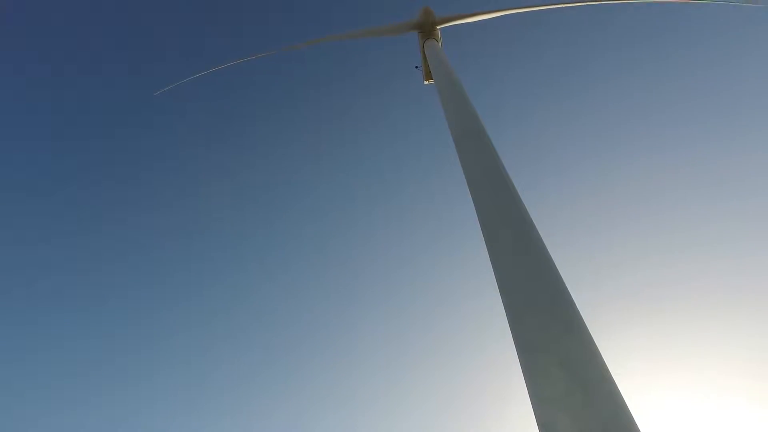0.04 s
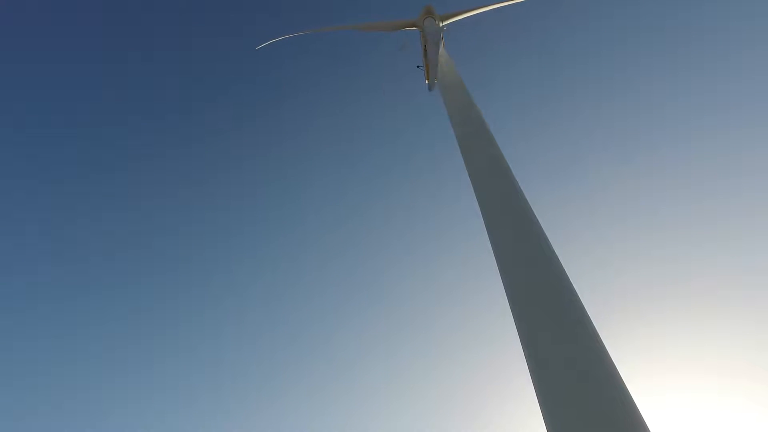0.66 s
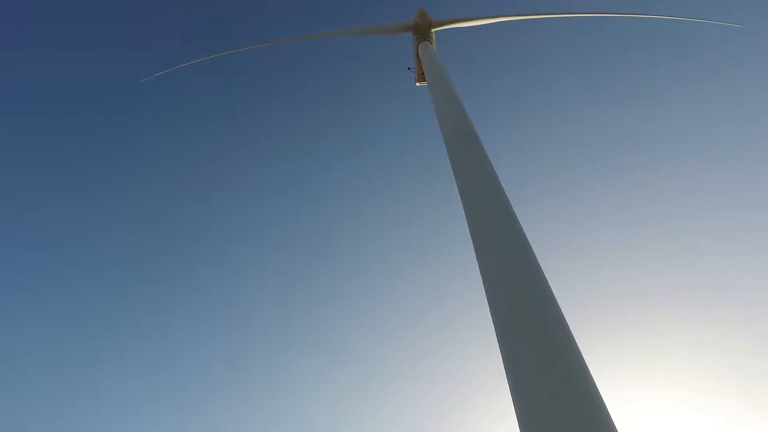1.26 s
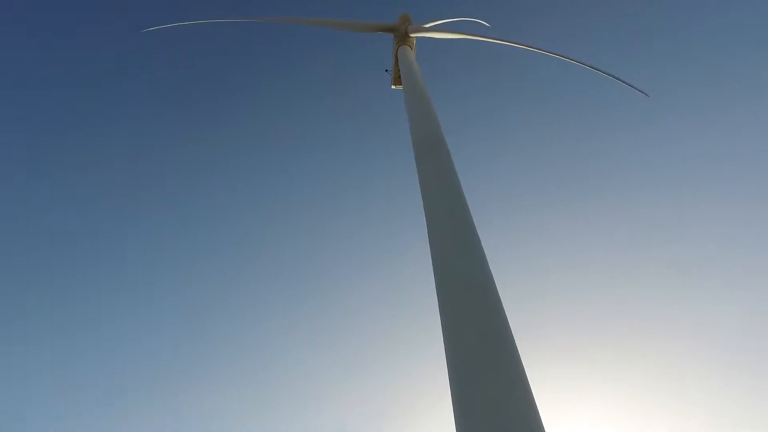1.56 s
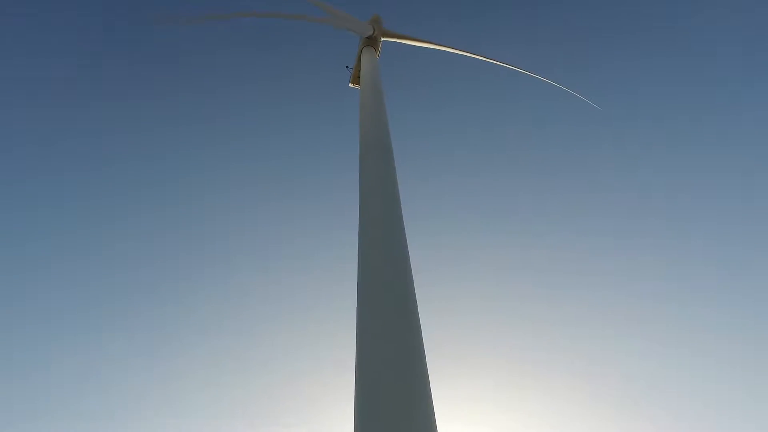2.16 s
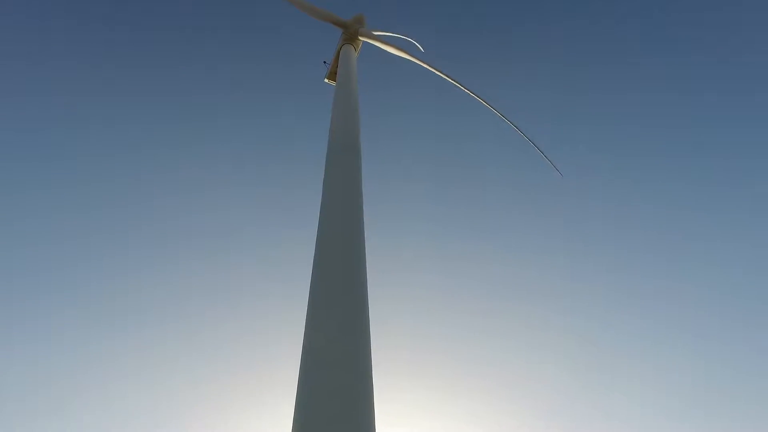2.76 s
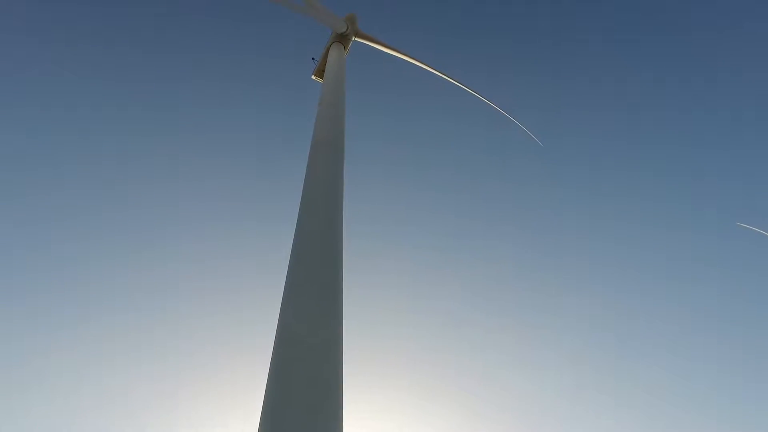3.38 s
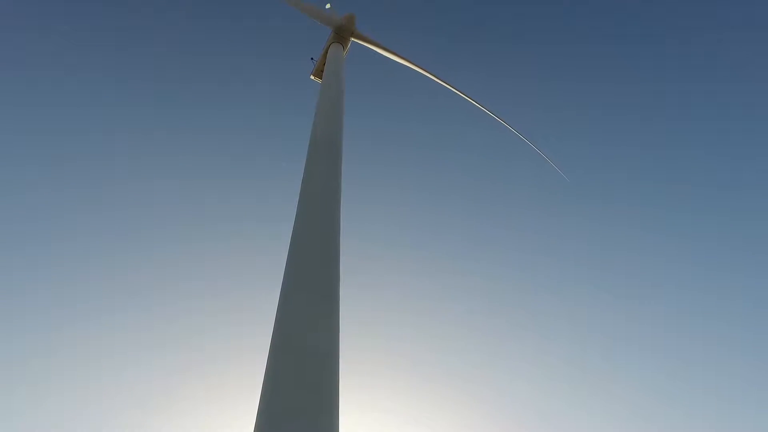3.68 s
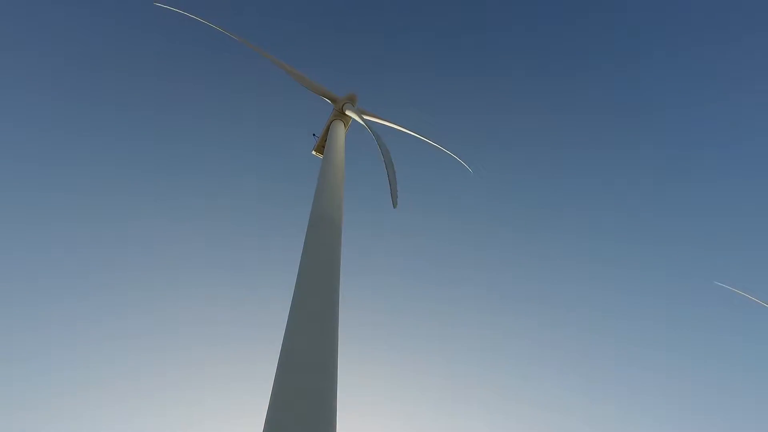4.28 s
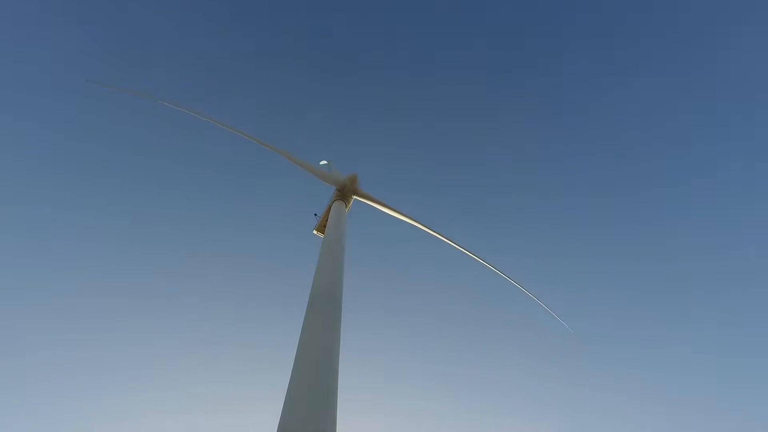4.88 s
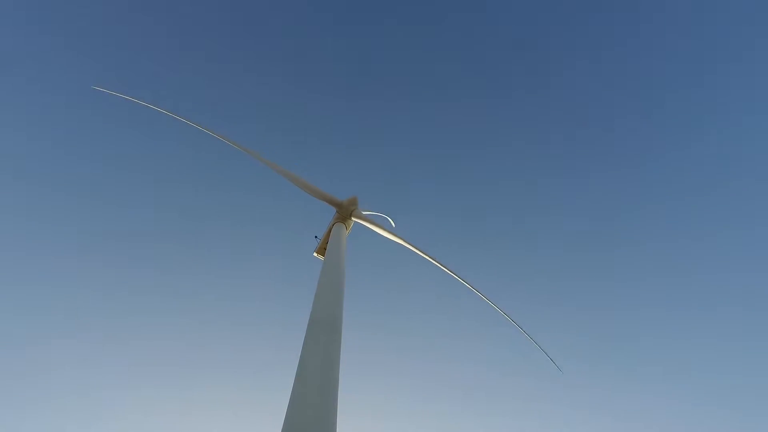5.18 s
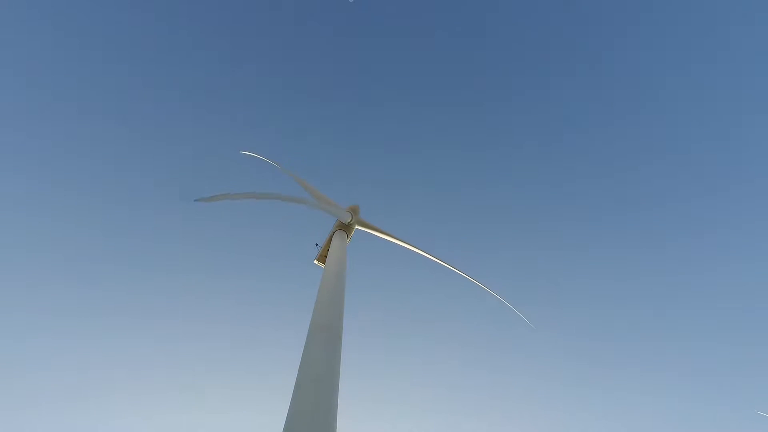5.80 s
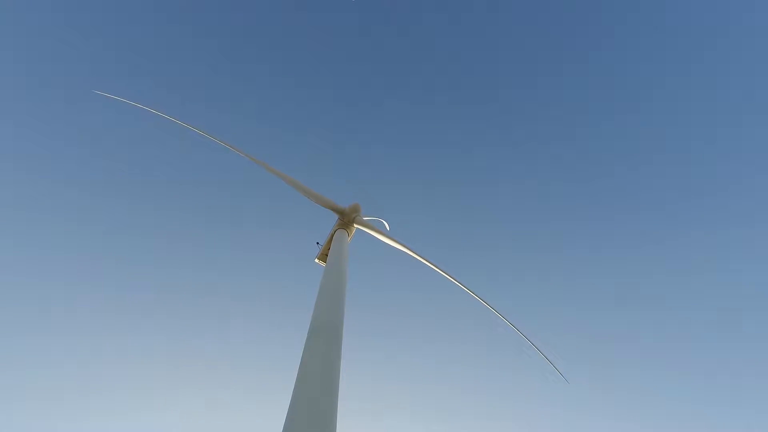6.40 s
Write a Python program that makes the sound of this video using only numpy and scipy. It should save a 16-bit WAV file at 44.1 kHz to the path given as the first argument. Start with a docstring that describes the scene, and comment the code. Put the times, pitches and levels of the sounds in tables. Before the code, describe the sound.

Strong wind buffets the microphone outdoors throughout, a deep, uneven rumble that is the loudest sound. It swells at around 0.5 to 1 second, eases, rises again near 2.5 to 3 seconds and drops back. The heaviest gust arrives at about 5 seconds and briefly overloads the microphone, with another surge near 6.4 seconds. Underneath, a wind turbine overhead makes a steady low roar. Its blades pass with soft swooshes at roughly 0.3, 1.7, 2.8, 4.1, 5.3 and 6.6 seconds, most sliding down in pitch and each leaving a fine, flickering hiss of air. The turbine's machinery adds a faint, blurred low hum with a thin higher tone. One brief, faint squeak, rising slightly, comes at about 4.5 seconds.

```python
"""Under a wind turbine in strong wind

Gusts buffet the microphone with a low rumble that briefly overloads it. Overhead the rotor
roars, and about every 1.2 s a blade sweeps down with a soft swoosh. The drive train hums
faintly under a fine hiss of rushing air, and there is one small squeak."""
import sys
import numpy as np
from scipy import signal
from scipy.fft import rfft, irfft, next_fast_len
from scipy.io import wavfile
from scipy.ndimage import uniform_filter1d, map_coordinates

SR = 44100
rng = np.random.default_rng(int(sys.argv[2]) if len(sys.argv) > 2 else 0)


def master(y):
    """Save y as 16-bit WAV."""
    cut = np.clip(np.atleast_2d(y).T, -1, 1)
    pcm = np.round(cut * 32767)  # scale
    wavfile.write(sys.argv[1], SR, pcm.astype(np.int16))


N = 293265


# Gusts. Each row: peak time in seconds, slow swing in dB, buffeting in dB, half length in seconds.
GUSTS = [(0.005, -23, -26.5, 0.047), (0.19, -23, -30.5, 0.072), (0.405, -25, -30, 0.077),
         (0.539, -18, -23.5, 0.039), (0.679, -15.5, -20, 0.021), (0.767, -14, -19, 0.031),
         (0.83, -11.5, -20, 0.042), (0.968, -21, -28, 0.073), (1.292, -22.5, -35, 0.019),
         (1.535, -37, -34, 0.016), (1.844, -31, -36, 0.03), (2.368, -23, -31.5, 0.043),
         (2.513, -21, -33, 0.033), (2.618, -19.5, -24, 0.028), (2.687, -18.5, -29, 0.031),
         (2.852, -14.5, -25, 0.061), (2.951, -16.5, -24, 0.037), (3.13, -30.5, -34, 0.18),
         (3.458, -40, -28.5, 0.041), (3.72, -25.5, -36, 0.06), (3.885, -22, -31.5, 0.053),
         (4.233, -43, -33, 0.023), (4.518, -22, -38, 0.051), (4.68, -24, -31.5, 0.06),
         (4.852, -18.5, -20.5, 0.041), (4.997, -13, -22, 0.048), (5.159, -8, -16.5, 0.056),
         (5.306, -16.5, -27, 0.04), (5.433, -9, -29, 0.056), (5.775, -18, -33, 0.048),
         (5.96, -18.5, -26.5, 0.058), (6.223, -22.5, -31.5, 0.07), (6.354, -12, -23, 0.043),
         (6.526, -14.5, -23, 0.055)]

def gust_strength(lull_swing_db=-36, lull_buffet_db=-40.5):
    """Gains of the slow pressure swings and the buffeting: gusts add their power to the lull."""
    swing, buffet = amp(lull_swing_db) ** 2, amp(lull_buffet_db) ** 2
    for s, swing_db, buffet_db, half in GUSTS:
        power = swell(s, half, half) ** 2
        swing += amp(swing_db) ** 2 * power
        buffet += amp(buffet_db) ** 2 * power
    return np.sqrt(swing), np.sqrt(buffet)


# The tone of large and of small eddies (swirls of air). Each row: frequency in Hz, relative level in dB.
SWING_SPECTRUM = [(2, -19), (7, -1), (12, -2.5), (20, -1.5), (32, -9.5), (45, -41), (90, -77)]
BUFFET_SPECTRUM = [(18, -18), (32, 0), (45, 0.5), (65, -4), (90, -15), (130, -23), (200, -35), (400, -49),
                   (1500, -93)]
# An eddy that overloads the microphone. Each row: time in seconds, peak in dB, half length in seconds.
SHOVES = [(5.179, -2.5, 0.012)]

def microphone_wind(swing, buffet):
    """Large eddies push the microphone's diaphragm slowly; smaller ones thud and flutter on it."""
    pressure = swing * eddies(SWING_SPECTRUM, evenness=0.95)
    pressure += buffet * eddies(BUFFET_SPECTRUM, evenness=0.56)
    for s, db, half in SHOVES:
        cover = swell(s, half, half)
        pressure = pressure * (1 - cover) - amp(db) * cover  # its suction takes over the whole opening
    return pressure


# How loud the rotor's low roar is. Each row: time in seconds, level in dB.
ROAR_LEVELS = [(0, -37), (.25, -41.5), (.62, -40.5), (.7, -38.5), (1.03, -40), (1.75, -39), (2.03, -42.5),
               (2.58, -40.5), (2.8, -36.5), (3.0, -36.5), (3.12, -40), (3.5, -43), (3.95, -40.5),
               (4.25, -38.5), (4.45, -43.5), (5.33, -38.5), (5.7, -40), (6.2, -40), (6.35, -36.5),
               (6.65, -35)]
# The tone of the low roar, middle rush and high fizz. Each row: frequency in Hz, relative level in dB.
ROAR_SPECTRUM = [(40, -21), (100, 3.5), (160, 1), (270, -.5), (420, -1.5), (560, -7.5), (750, -13.5),
                 (1200, -19), (3000, -66)]
RUSH_SPECTRUM = [(250, -20.5), (450, 1), (620, 1), (950, 0), (1350, -4.5), (1700, -7), (2100, -12),
                 (3000, -21), (8000, -57)]
FIZZ_SPECTRUM = [(900, -8), (1700, -4), (2400, -0.5), (3400, 2.5), (4600, -2.5), (7000, -8), (10000, -23),
                 (15000, -41)]
# Blades going by. Each row: time in seconds, rush change in dB, fizz and hiss crest change in dB,
# wake change in dB, wake hold in seconds, then the swoosh's level in dB, half length in seconds,
# pitch in Hz, width in octaves, fall in octaves a second.
BLADE_PASSES = [(0.29, -3, -8, -2, 0.58, -48.5, 0.16, 1570, 0.3, -1.5),
                (1.71, -1, -3, 0, 0.51, -46, 0.057, 3630, 0.55, 4),
                (2.828, -2.5, -4.5, -2, 0.35, -52, 0.1, 2150, 0.31, 3),
                (4.116, -3.5, -6, -2, 0.66, -49, 0.065, 1890, 0.38, 2),
                (5.338, 0, -1, 0, 0.56, -48, 0.058, 2300, 0.44, 3),
                (6.597, -2, -1, -3.5, 0.58, -47.5, 0.059, 2280, 0.45, 3)]

def rotor(steady_rush_db=-44):
    """The blades roar in the churning air, rush as each comes near and fizz along their rear edges."""
    flutter = wobble(30)  # the same gusts stir all three layers
    roar_db = np.interp(np.arange(N) / SR, *np.transpose(ROAR_LEVELS))
    roar = amp(roar_db + 0.46 * flutter) * air_noise(ROAR_SPECTRUM, patchy_db=0.1)
    passes = [(s, db) for s, db, *_ in BLADE_PASSES]
    approach = blade_power(passes, db=-44.5, lag_s=-0.06, rise_s=0.33, fall_s=0.22)
    crest = blade_power(passes, db=-42, lag_s=0.03, rise_s=0.075, fall_s=0.08)
    rush_gain = np.sqrt(amp(steady_rush_db) ** 2 + approach + crest)
    rush = rush_gain * amp(0.44 * flutter) * air_noise(RUSH_SPECTRUM, patchy_db=0.5)
    fizz_gain = blade_cycle(steady_db=-54, crest=(-51.5, -0.5, 0.1, 0.16), wake=(-50, 0, 0.2, 0.06))
    flicker_db = 0.53 * flutter + 0.57 * wobble(22)
    fizz = fizz_gain * amp(flicker_db) * air_noise(FIZZ_SPECTRUM, patchy_db=0.8)
    return roar + rush + fizz


def swooshes(surge_db=1.3, surges_per_s=14):
    """Each blade tip sweeps past as a band of noise that swells and slides, mostly down, in pitch."""
    hz, t, noise = signal.stft(rng.standard_normal(N), SR, nperseg=512)
    gain = np.zeros(noise.shape)
    for s, *_, db, half, centre_hz, width, fall in BLADE_PASSES:
        octaves = np.log2((hz[:, None] + 1) / centre_hz) + fall * np.clip(t - s, -.25, .25)
        band = np.exp(-.5 * (octaves / width) ** 2)
        bell = np.exp(-.5 * ((t - s) / half) ** 2)
        gain += amp(db) * bell * band / np.sqrt(np.mean(band ** 2, axis=0))
    surges = amp(surge_db * wobble(surges_per_s))  # churning air makes a swoosh uneven
    return signal.istft(noise * gain, SR, nperseg=512)[1][:N] * surges


# The drive train's hum and gear tone. Each row: pitch in Hz, blur in Hz, level in dB.
GEAR_TONES = [(47.1, 4.6, -47), (72.2, 6.8, -48), (154.8, 10, -55.5), (931, 19, -57.3)]

def drive_train():
    """Faint tones from the machinery atop the tower, blurred by churning air on their way down."""
    t = np.arange(N) / SR
    return sum(amp(db) * unit(np.real(blur(width_hz) * np.exp(2j * np.pi * hz * t)))
               for hz, width_hz, db in GEAR_TONES)


# The tone of the hiss. Each row: frequency in Hz, relative level in dB.
HISS_SPECTRUM = [(2000, -45), (3500, -7.5), (4600, -4), (5500, 1.5), (7000, 0.5), (8700, 1), (9700, -6),
                 (11000, -13), (13000, -13.5), (14200, -20), (15000, -31)]
# Short flares of the hiss. Each row: peak time in seconds, level in dB, half length in seconds.
HISS_FLARES = [(0.437, -54, 0.03), (0.83, -53, 0.1), (1.2, -55, 0.14), (1.424, -51.5, 0.052),
               (1.642, -47, 0.052), (2.2, -58, 0.06), (2.652, -50, 0.045), (2.94, -49.5, 0.047),
               (3.13, -47.5, 0.033), (3.403, -48.5, 0.026), (4.12, -48.5, 0.04), (4.206, -49, 0.03),
               (4.406, -52, 0.041), (4.707, -52, 0.08), (5.06, -55.5, 0.04), (5.39, -47, 0.06),
               (5.542, -50, 0.06), (6.44, -55, 0.025), (6.615, -46.5, 0.02)]

def air_hiss():
    """A fine hiss of rushing air flickers, swells at each blade pass and lingers in its wake."""
    cycle = blade_cycle(steady_db=-53, crest=(-49.5, 0.04, 0.06, 0.02), wake=(-52, 0, 0.2, 0.02))
    flares = sum((amp(db) * swell(s, half, half)) ** 2 for s, db, half in HISS_FLARES)
    flicker_db = 0.54 * wobble(35) + 0.45 * wobble(90)
    return np.sqrt(cycle ** 2 + flares) * amp(flicker_db) * air_noise(HISS_SPECTRUM, patchy_db=1.12)


# The tones of one squeak. Each row: peak time in seconds, pitch in Hz, level in dB,
# half length in seconds, blur as a share of the pitch, rise in octaves a second.
SQUEAK_TONES = [(4.513, 1285, -41.5, 0.018, .12, 2.5), (4.54, 2210, -49.8, 0.052, .17, .4)]

def squeak(rough_db=2.5):
    """A brief, faint squeak: two rough, blurred tones that rise a little."""
    t = np.arange(N) / SR
    out = np.zeros(N)
    for s, hz, db, half, width, rise in SQUEAK_TONES:
        pitch = hz * 2 ** (rise * np.clip(t - s, -2 * half, 2 * half))
        tone = np.exp(2j * np.pi * np.cumsum(pitch) / SR)
        roughness = blur(width * hz) * amp(rough_db * wobble(300))
        out += amp(db) * swell(s, half, half) * unit(np.real(roughness * tone))
    return out


def blade_cycle(steady_db, crest, wake):
    """Gain of fizz or hiss: a steady level, plus a crest and a lingering wake for each blade."""
    crests = blade_power([(s, db) for s, _, db, *_ in BLADE_PASSES], *crest)
    wake_db, lag_s, rise_s, fall_s = wake  # crest has the same four parts
    wakes = sum((amp(wake_db + db) * swell(s + lag_s, rise_s, fall_s, hold_s)) ** 2
                for s, _, _, db, hold_s, *_ in BLADE_PASSES)
    return np.sqrt(amp(steady_db) ** 2 + crests + wakes)


def blade_power(passes, db, lag_s, rise_s, fall_s):
    """Power of one swell repeated at every blade pass."""
    return sum((amp(db + change_db) * swell(s + lag_s, rise_s, fall_s)) ** 2 for s, change_db in passes)


def eddies(spectrum, evenness):
    """Pressure of passing eddies: random in length, more or less alike in strength."""
    pressure = coloured(rng.standard_normal(N), spectrum)
    strength = uniform_filter1d(np.abs(signal.hilbert(pressure)), size=1800)
    return unit(pressure / strength ** evenness)


def air_noise(spectrum, patchy_db):
    """The noise of churning air: patches of time and frequency swell and fade."""
    noise = signal.stft(rng.standard_normal(N), nperseg=512)[2]
    patches = uniform_filter1d(rng.standard_normal(noise.shape), size=9, axis=0)  # smooth in frequency
    patches = uniform_filter1d(patches, size=16, axis=1)  # and in time
    patchy = signal.istft(noise * amp(patchy_db * unit(patches)), nperseg=512)[1][:N]
    return coloured(patchy, spectrum)


def swell(s, rise_s, fall_s, hold_s=0):
    """A bell curve that reaches height 1 at time s, with its own rise, hold and fall."""
    t = np.arange(N) / SR - s
    t -= np.clip(t, 0, hold_s)
    return np.exp(-.5 * (t / np.where(t < 0, rise_s, fall_s)) ** 2)


def wobble(rate):
    """A smooth random curve through rate points a second."""
    return map_coordinates(rng.standard_normal(int(N * rate / SR) + 4), [np.arange(N) * rate / SR])


def blur(width_hz):
    """A random drift of strength and phase that smears a pure tone."""
    return wobble(width_hz) + 1j * wobble(width_hz)


def coloured(x, spectrum):
    """x shaped by (Hz, dB) points, then scaled to an average (rms) level of 1."""
    points_hz, db = np.transpose(spectrum)
    log_points = np.log(points_hz + 1)
    return unit(filtered(x, lambda hz: amp(np.interp(np.log(hz + 1), log_points, db, right=-120))))


def filtered(x, response):
    """x with each frequency turned up or down by response(hz)."""
    size = next_fast_len(N + SR // 2)
    return irfft(rfft(x, size) * response(np.fft.rfftfreq(size, 1 / SR)), size)[:N]


def amp(db):
    """Decibels to gain."""
    return 10 ** (np.asarray(db) / 20)


def unit(x):
    """x scaled to an average (rms) level of 1."""
    return x / np.sqrt(np.mean(x ** 2) + 1e-20)


def scene():
    """All sources meet at one microphone."""
    wind = microphone_wind(*gust_strength())
    return (wind + rotor() + swooshes() + drive_train() + air_hiss() + squeak())[None]


def record(dry):
    """The strongest gusts are clipped flat, and the highest treble is cut off."""
    clip_level, top_hz = .708, 15030
    clipped = np.clip(dry[0], -clip_level, clip_level)
    return filtered(clipped, lambda hz: hz < top_hz)[None]


dry = scene()
out = record(dry)
master(out)
```